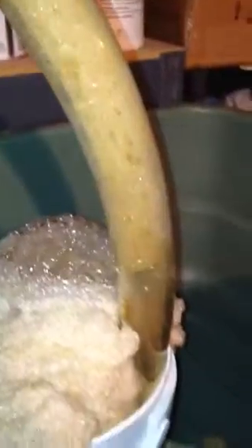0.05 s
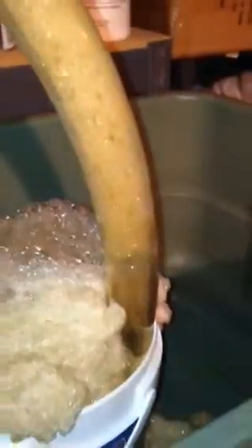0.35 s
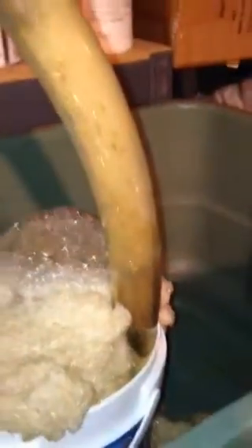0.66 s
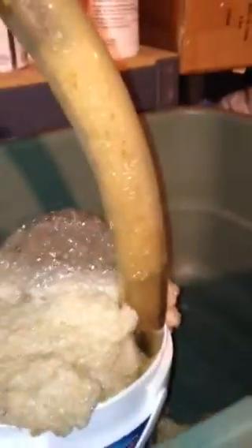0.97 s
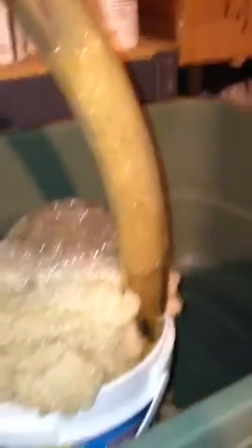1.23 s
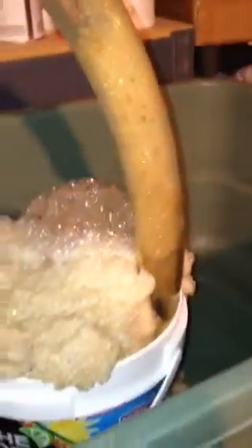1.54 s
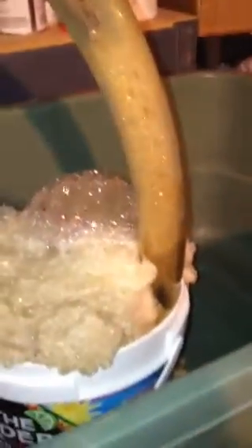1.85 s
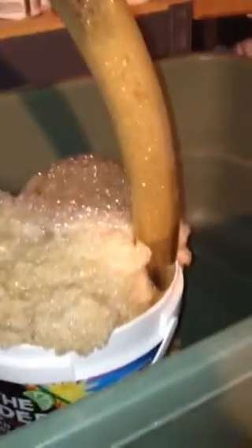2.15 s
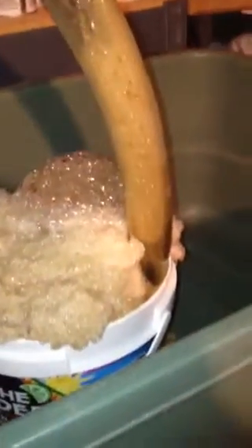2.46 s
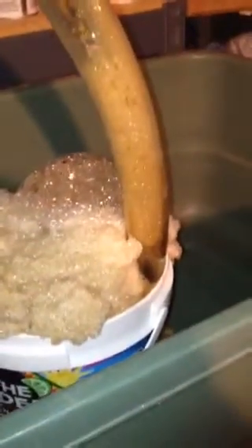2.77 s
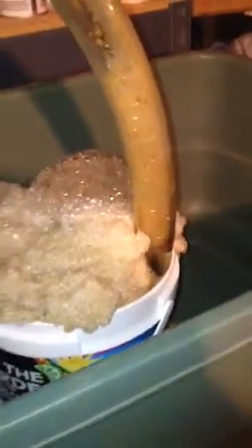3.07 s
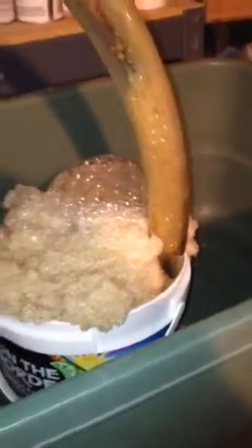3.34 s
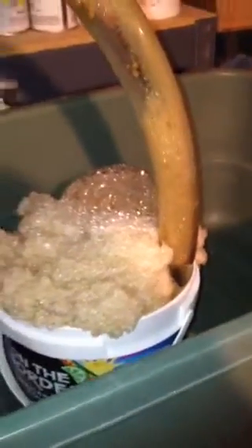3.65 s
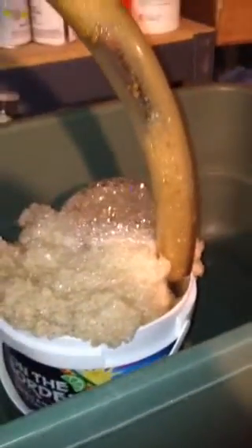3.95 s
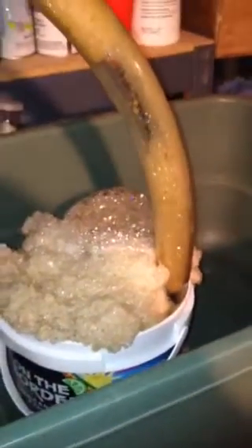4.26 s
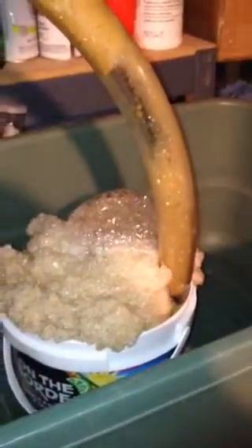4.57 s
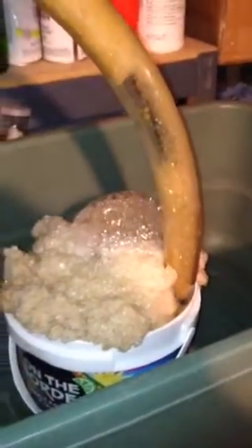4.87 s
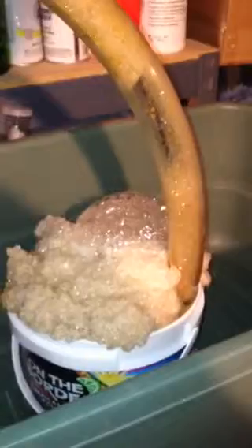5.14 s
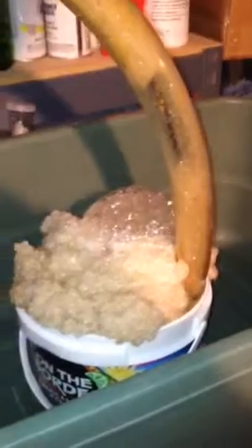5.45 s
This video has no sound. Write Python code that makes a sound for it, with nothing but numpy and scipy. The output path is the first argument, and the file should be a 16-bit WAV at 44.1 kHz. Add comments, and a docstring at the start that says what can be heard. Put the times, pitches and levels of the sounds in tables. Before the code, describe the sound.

A faint electrical hum and hiss run throughout in a quiet room, with the slightest fizz of foam. From the start until about 1.5 seconds, gas bubbles from a hose into a bucket in soft, low bloops, about four a second. At about 1.25 seconds the hand holding the camera shifts and the plastic case gives one sharp pop, very close and by far the loudest sound. From about 1.6 seconds skin rubs over the case in uneven strokes, a low rumble with small clicks and crackles, which grow sharper and busier between 3.3 and 3.9 seconds. Then there is a lull with only the hum and hiss. Near 5.3 seconds the foam gives a thin, faint squeak, and a last light scuff and crackle on the case follow until about 5.8 seconds.

```python
"""Over mains hum, hiss and the faint fizz and squeak of foam, fermenting beer vents through a hose into
a bucket: soft bloops, about four a second, for a second and a half. Near 1.25 s the hand holding the
camera shifts its grip and the case gives one loud pop. Skin then rubs over the plastic in strokes, a low
rumble with small crackles, until about 3.9 s. After a lull, a thin foam squeak and a last light scuff
and crackle come between 5.2 and 5.8 s."""
import sys
import numpy as np
from scipy import signal
from scipy.fft import rfft, irfft, next_fast_len
from scipy.io import wavfile
from scipy.ndimage import map_coordinates

SR = 44100
rng = np.random.default_rng(int(sys.argv[2]) if len(sys.argv) > 2 else 0)


def file_out(sig):
    """Save sig as 16-bit WAV at sys.argv[1]."""
    # one column per channel
    cols = np.atleast_2d(sig).T
    # limit, then scale
    lim = np.clip(cols, -1, 1)
    pcm = np.round(lim * 32767).astype(np.int16)
    wavfile.write(sys.argv[1], SR, pcm)


N = 251811


def amp(db):
    """Decibels to gain."""
    return 10 ** (np.asarray(db) / 20)


def unit(x):
    """Scale to rms 1."""
    return x / np.sqrt(np.mean(x ** 2) + 1e-20)


def add(track, s, sound):
    """Mix a sound into the track at time s."""
    part = track[max(round(s * SR), 0):][:len(sound)]
    part += sound[:len(part)]


def wobble(rate):
    """A smooth random curve, rate knots a second."""
    knots = rng.standard_normal(int(N * rate / SR) + 4)
    return map_coordinates(knots, [np.arange(N) * rate / SR])


def coloured(x, points, tilt_db=0):
    """EQ x through (Hz, dB) points, with a tilt per octave; rms 1."""
    size = next_fast_len(len(x) + 4096)
    octave = np.log2(np.fft.rfftfreq(size, 1 / SR) + 1)
    hz, db = np.transpose(points)
    gain = amp(np.interp(octave, np.log2(hz), db) + tilt_db * octave)
    return unit(irfft(rfft(x, size) * gain, size)[:len(x)])


def crackle(size, rate, spread_db, smooth):
    """Tiny ticks of uneven strength, rate a second, over smooth noise."""
    ticks = (rng.random(size) < rate / SR) * rng.choice([-1, 1], size)
    strength = amp(spread_db * np.clip(rng.standard_normal(size), -2, 2))
    return unit(ticks * strength) + smooth * rng.standard_normal(size)


def push(t, hz):
    """A one-sided pulse of height 1; higher hz is shorter."""
    u = 2 * np.pi * hz * np.maximum(t, 0)
    return u * np.exp(1 - u)


# partials of the mains hum: (frequency [Hz], rms level [dB])
HUM_PARTIALS = [(120, -89.5), (179.7, -74), (240, -73.5), (300, -87), (360, -84.5), (840, -93)]
# tone of the hiss: (frequency [Hz], gain [dB])
HISS_EQ = [(30, -24), (70, -24), (100, -17.5), (140, -3.5), (210, -1.5), (320, -4.5), (500, -6.5),
           (1000, -10.5), (2500, -14.5), (5000, -17.5), (8000, -22), (10500, -24.5), (12500, -21),
           (14000, -19)]


def room_tone(hiss_db=-71.5):
    """An appliance hums on multiples of the mains frequency over steady hiss."""
    hum, t = np.zeros(N), np.arange(N) / SR
    for hz, db in HUM_PARTIALS:
        peak = np.sqrt(2) * amp(db + 0.3 * wobble(4.3))
        hum += peak * np.sin(2 * np.pi * (hz * t + rng.random()))
    return hum + amp(hiss_db) * coloured(rng.standard_normal(N), HISS_EQ)


# swells of fizz: (peak time [s], level [dB], half length [s])
FIZZ_SWELLS = [(0.963, -73, 0.084), (1.514, -70.5, 0.04), (5.522, -79, 0.18)]
# tone of bursting foam cells: (frequency [Hz], gain [dB])
FIZZ_EQ = [(500, -29.5), (2500, -7), (6500, 1), (10000, -7), (14000, -12)]


def foam_fizz(sparse_db=-91):
    """Tiny cells burst on top of the foam, and many at once when it is pushed along."""
    t = np.arange(N) / SR
    swell = sum(amp(db) * np.exp(-((t - s) / width) ** 2) for s, db, width in FIZZ_SWELLS)
    sparse = coloured(crackle(N, rate=40, spread_db=2.0, smooth=0), FIZZ_EQ)
    dense = coloured(crackle(N, rate=1500, spread_db=2.5, smooth=0.5), FIZZ_EQ)
    return amp(sparse_db) * sparse + swell * dense


# thin chirps of the foam: (time [s], level [dB], pitch [Hz], length [s], rasp [0-1])
FOAM_SQUEAKS = [(0.131, -66.5, 4750, .005, .7), (0.198, -59.5, 4600, .005, 0.36),
                (3.926, -63.5, 8240, .002, 0.55), (5.273, -63.5, 2440, 0.09, .1),
                (5.522, -66.5, 7860, .005, .5)]


def foam_squeaks():
    """Gas squeezes through a wet film in short, wavering, raspy whistles."""
    out = np.zeros(N)
    for s, db, hz, length, rasp in FOAM_SQUEAKS:
        size = int(length * SR)
        pitch = hz * (1 + 0.037 * wobble(880)[:size])
        whistle = np.sin(2 * np.pi * np.cumsum(pitch) / SR)
        air_eq = [(0.66 * hz, -30), (hz, 0), (1.35 * hz, -5), (3 * hz, -25)]
        air = coloured(rng.standard_normal(size), air_eq)
        squeak = (1 - rasp / 2) * whistle + rasp * air
        add(out, s, amp(db) * signal.windows.tukey(size) * squeak)
    return out


# bubbles leaving the hose: (peak time [s], level [dB], pitch [Hz], half length [s])
BLOOPS = [(0.1334, -47.5, 330, 0.0025), (.385, -48.5, 353, 0.0033), (.404, -55.5, 780, .0065),
          (.415, -65, 983, .009), (0.647, -47.5, 342, 0.0026), (0.91, -46.5, 352, 0.0045),
          (1.186, -46.5, 333, .003), (1.455, -47.5, 335, 0.0029)]
# resonances of the air in the bucket: (frequency [Hz], relative level [dB], 60 dB decay [s])
BUCKET_MODES = [(222, -8.5, 0.12), (293, -21, .09), (387, -15.5, 0.12), (473, -15, 0.051)]


def bubbles(rise_per_s=10, trailer_s=0.041, trailer_db=-15):
    """Each bubble swells and pinches off in a few cycles; the air in the bucket rings on."""
    out, t = np.zeros(N), np.arange(-SR // 30, SR // 6) / SR
    for s, db, hz, width in BLOOPS:
        cycles = hz * (t + rise_per_s * t * t / 2)  # the pitch bends up as the neck closes
        bloop = np.exp(-(t / width) ** 2) * np.cos(2 * np.pi * cycles)
        ring_attack = 1 - np.exp(-(np.maximum(t, 0) / (2 * width)) ** 2)
        ring = np.zeros(len(t))
        for mode_hz, mode_db, t60 in BUCKET_MODES:
            decay = amp(mode_db + rng.normal(0, 0.71) - 60 * t / t60)
            ring += decay * np.sin(2 * np.pi * (mode_hz * t + rng.random()))
        add(out, s + t[0], amp(db) * (bloop + 2 * ring_attack * ring))
        add(out, s + trailer_s + t[0], amp(db + trailer_db) * bloop)  # a weaker bubble follows
    return out


# single slips on the case: (time [s], click level [dB], click brightness [Hz], thump level [dB])
FINGER_SLIPS = [(.549, -49, 1310, -70), (1.1982, -49, 1500, -25.5), (1.2545, -11.5, 1310, -21.5),
                (1.256, -7, 2300, -9.5), (1.2613, -7.5, 6970, -21.5), (1.8125, -44, 1500, -54),
                (1.8734, -39.5, 800, -54), (1.9063, -37.5, 353, -43), (2.0475, -32, 450, -43.5),
                (2.2119, -50, 400, -42.5), (2.357, -49, 673, -41), (2.5975, -41.5, 378.4, -46),
                (2.8685, -44.5, 398, -46), (3.0374, -46, 129.3, -39.5), (3.1916, -42, 910, -53),
                (3.4098, -33.5, 3460, -37), (3.4292, -24, 4950, -35), (3.4402, -36, 520, -42),
                (3.4869, -29.5, 4240, -39), (3.4923, -28.5, 506, -37), (3.5902, -59, 287, -33),
                (3.739, -25, 190, -29.5), (3.8013, -22.5, 4200, -25.5), (3.881, -33.5, 11950, -82.5),
                (5.246, -74, 368, -49), (5.4758, -45.5, 3780, -80)]
# tone of skin sliding on plastic: (frequency [Hz], gain [dB])
SKIN_EQ = [(25, -65), (60, -28.5), (150, -1), (600, -1.5), (2000, -9.5), (4000, -14.5), (7000, -22),
           (10000, -30.5), (15000, -35)]


def finger_slips(thump_hz=315.0, creep_db=-27, creep_t60=0.038, low_cut_hz=120.85, high_cut_hz=7600):
    """Strain lets go with a click; the case springs back with a thump and the skin creeps on briefly."""
    out, t = np.zeros(N), np.arange(-SR // 100, SR // 20) / SR
    for s, click_db, hz, thump_db in [*FINGER_SLIPS, *judders(), *snags()]:
        click = np.exp(-2 * np.pi * hz * np.abs(t))
        tail = (t > 0) * amp(creep_db - 60 * np.abs(t) / creep_t60)
        creep = tail * coloured(rng.standard_normal(len(t)), SKIN_EQ)
        thump = amp(thump_db) * push(t, thump_hz)
        add(out, s + t[0], thump - amp(click_db) * (click + creep))
    # the plastic passes little high treble
    out = signal.sosfilt(signal.butter(2, high_cut_hz, fs=SR, output='sos'), out)
    # the microphone's bass cut turns each push into a short swing
    return signal.sosfilt(signal.butter(4, low_cut_hz, 'high', fs=SR, output='sos'), out)


# resonances of the case and its hollow: (frequency [Hz], bandwidth [Hz], level over direct sound [dB])
CASE_MODES = [(175, 60, -11), (423, 45, -4), (573.4, 60, -9.5), (893, 49, -2), (1192, 50, -9.5),
              (1453, 45, -4), (2016, 45, -3.5), (2390, 40, -3), (2610, 35, -4)]


def case_ring(handling, trim_db=-1.5):
    """Everything the hand does reaches the microphone through the case, which rings briefly."""
    ring = sum(amp(db) * signal.lfilter(*signal.iirpeak(hz, hz / width, SR), handling)
               for hz, width, db in CASE_MODES)
    return amp(trim_db) * (handling + ring)


# skin scuffing the case: (peak time [s], level [dB], rise [s], fall [s], tilt [dB/octave])
SKIN_SCUFFS = [(1.196, -54.5, .13, 0.12, -1), (1.268, -29.5, .019, 0.037, 4), (1.281, -38, .03, .02, 3),
               (1.34, -66.5, 0.18, .21, 4), (1.508, -59.5, 0.064, 0.15, 1), (1.645, -36.5, 0.038, 0.12, -3),
               (3.497, -54, 0.045, 0.04, 0), (3.59, -56, 0.092, 0.11, -2), (5.54, -68, .2, 0.47, 2),
               (5.66, -60.5, 0.092, 0.12, -5.5)]


def scuffs(fade_db=39.4):
    """Short slides of skin: a swell of dense catches that dies away."""
    out, t = np.zeros(N), np.arange(-SR // 4, SR // 4) / SR
    for s, db, rise, fall, tilt_db in SKIN_SCUFFS:
        catches = crackle(len(t), rate=2500, spread_db=3.5, smooth=0.27)
        envelope = amp(db - fade_db * np.maximum(-t / rise, t / fall))
        add(out, s + t[0], envelope * coloured(catches, SKIN_EQ, tilt_db))
    return out


# quick runs of slips, the loudest being part of the pop: (peak time [s], click level [dB],
# click brightness [Hz], thump level [dB], gap between slips [s], rise [s], fall [s])
JUDDER_RUNS = [(1.1968, -44, 1400, -43, .005, 0.062, 0.011), (1.2561, -14, 1150, -23.5, .00168, .01, 0.031),
               (3.335, -41.5, 1200, -42, .0035, .014, 0.012), (3.449, -34.5, 3470, -52, .012, 0.018, 0.052),
               (3.5041, -34.5, 1200, -45, 0.0076, .01, .025),
               (3.8133, -35.5, 2000, -41.5, 0.0037, 0.021, 0.033),
               (5.6559, -37, 3830, -63, .006, 0.019, 0.0077)]


def judders(per_side=10, slowing=0.06, fade_db=18.5, scatter_db=2.0, brighten_octaves=3.4):
    """Cues for finger_slips: skin sticks and slips in a run, tightest and hardest at the peak."""
    cues, k = [], np.arange(-per_side, per_side + 1)
    for s, click_db, hz, thump_db, gap, rise, fall in JUDDER_RUNS:
        t = gap * k * (1 + slowing * np.abs(k))
        progress = np.where(t < 0, t / rise, t / fall)  # -1 at the start, 0 at the peak, 1 at the end
        shape_db = -fade_db * np.abs(progress) + scatter_db * rng.standard_normal(len(k))
        brightness = hz * 2 ** (brighten_octaves * progress)  # brighter as the skin speeds up
        thumps_db = thump_db + 1.8 * shape_db  # thumps fade faster than clicks
        run = np.column_stack([s + t, click_db + shape_db, brightness, thumps_db])
        cues.extend(run[np.abs(progress) < 1])
    return cues


# strokes of the grip: (start [s], end [s], rumble level [dB], grit level [dB], swell start to end [dB])
GRIP_STROKES = [(1.66, 1.843, -49.5, -62.5, 2), (1.92, 2.035, -48, -67, -5.5),
                (2.237, 2.343, -60, -76.5, 2), (2.428, 2.437, -59, -73.5, -0.5),
                (2.555, 2.592, -66.5, -76, -1.5), (2.889, 2.922, -61, -69.5, 0.5),
                (3.023, 3.083, -57, -67, -2.5), (3.22, 3.427, -59.5, -64, 7),
                (3.466, 3.548, -64, -63, -5.5), (3.705, 3.805, -66.5, -66, -2)]
# low body of the rub: (frequency [Hz], gain [dB])
RUMBLE_EQ = [(25, -59), (55, -16.5), (85, -8.5), (140, 0), (220, 2), (380, -6.5), (620, -19), (900, -24.5),
             (1500, -67)]
# grainy top of the rub: (frequency [Hz], gain [dB])
GRIT_EQ = [(260, -20), (450, -2.5), (647, -7.5), (725, -1.5), (874, -16), (1070, -11), (4690, -30.5),
           (9000, -57), (11700, -76), (19800, -120)]


def rubbing(attack_s=0.067, release_s=0.075, fade_db=18, resting_db=-70.5):
    """The grip creeps over the case in strokes: a lumpy rumble with finer grit on top."""
    t = np.arange(N) / SR
    gripping = (t > GRIP_STROKES[0][0]) & (t < GRIP_STROKES[-1][1])
    rumble_db = np.where(gripping, resting_db, -np.inf)
    grit_db = np.full(N, -np.inf)
    for start, end, low_db, high_db, swell_db in GRIP_STROKES:
        outside = np.maximum(0, np.maximum((start - t) / attack_s, (t - end) / release_s))
        shape_db = np.interp(t, [start, end], [-swell_db / 2, swell_db / 2]) - fade_db * outside
        rumble_db = np.maximum(rumble_db, low_db + shape_db)
        grit_db = np.maximum(grit_db, high_db + shape_db)
    pressure_db = 2.34 * wobble(45)
    rumble = coloured(crackle(N, rate=450, spread_db=3.0, smooth=0.54), RUMBLE_EQ)
    grit = coloured(crackle(N, rate=1200, spread_db=4.5, smooth=0.66), GRIT_EQ)
    return amp(rumble_db + pressure_db) * rumble + amp(grit_db + pressure_db) * grit


def snags(per_s=14, max_count=12, over_grit_db=14, scatter_db=2.5, brightness_hz=1118, thump_db=-7):
    """Cues for finger_slips: skin catches at random in each stroke, harder where it is grittier."""
    cues = []
    for start, end, _, grit_db, _ in GRIP_STROKES:
        times = start + np.cumsum(rng.exponential(1 / per_s, max_count))
        levels = grit_db + over_grit_db + scatter_db * rng.standard_normal(max_count)
        cues += [(s, db, brightness_hz, db + thump_db) for s, db in zip(times, levels) if s < end]
    return cues


def scene():
    """Room, bucket and handling noise, mixed in mono."""
    room_and_bucket = room_tone() + bubbles() + foam_fizz() + foam_squeaks()
    handling = scuffs() + rubbing() + finger_slips()
    return (room_and_bucket + case_ring(handling))[None]


def record(dry, top_hz=15350):
    """The camera's band limit: a brick-wall high cut."""
    size = next_fast_len(N + SR // 4)
    passband = np.fft.rfftfreq(size, 1 / SR) < top_hz
    return irfft(rfft(dry, size) * passband, size)[:, :N]


dry = scene()
out = record(dry)
file_out(out)
```